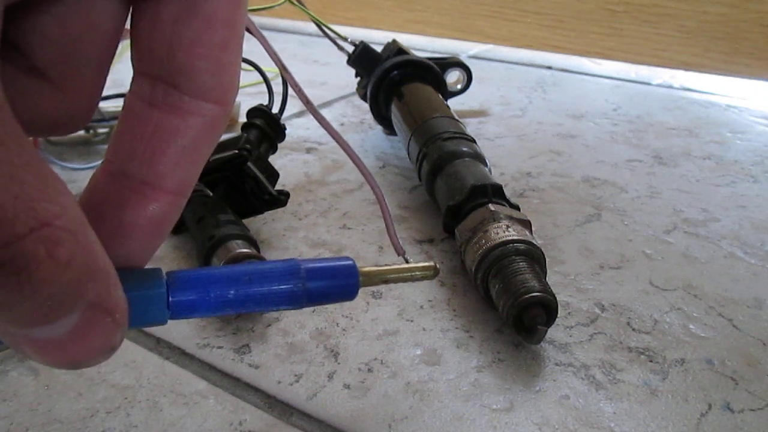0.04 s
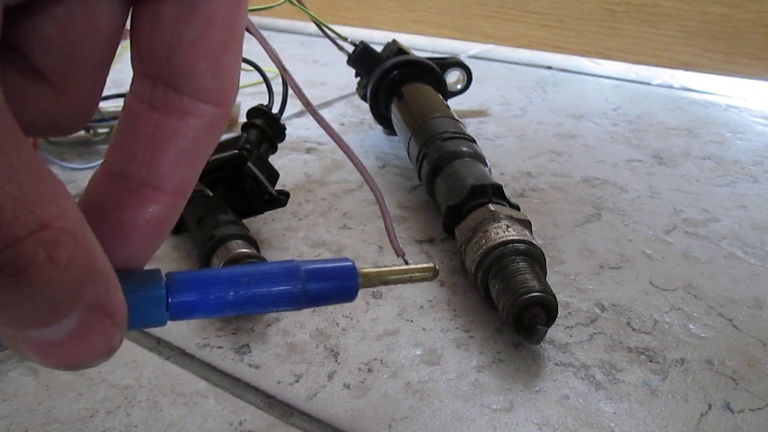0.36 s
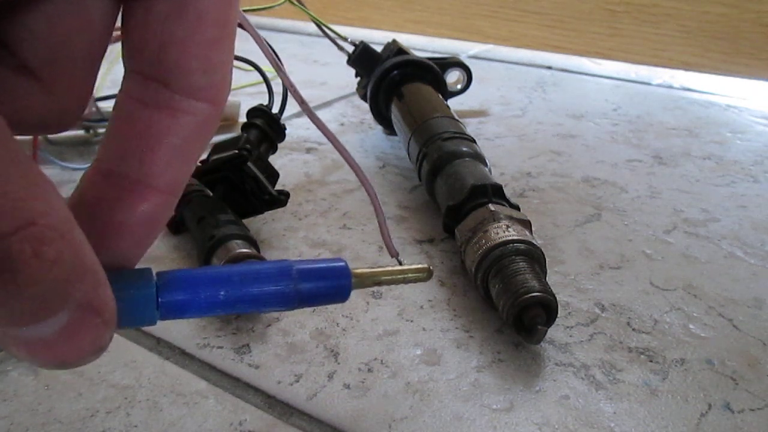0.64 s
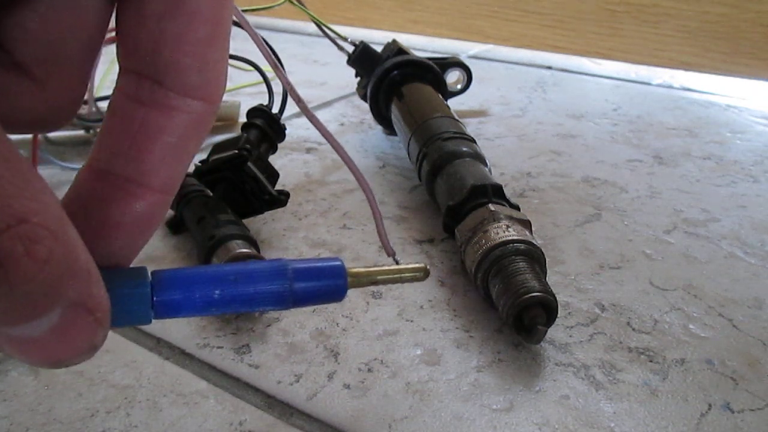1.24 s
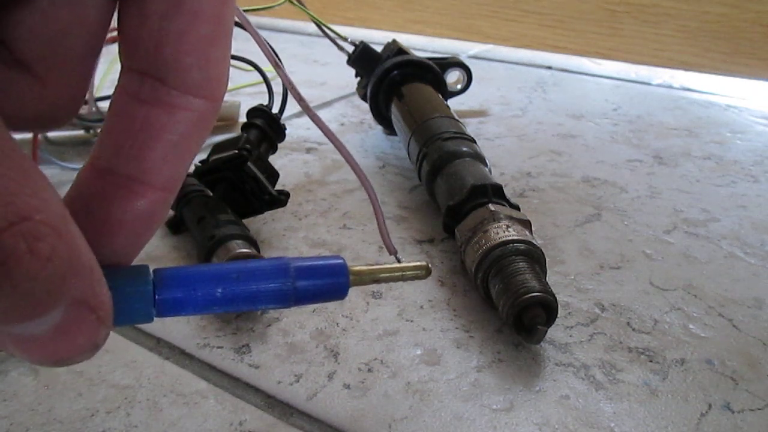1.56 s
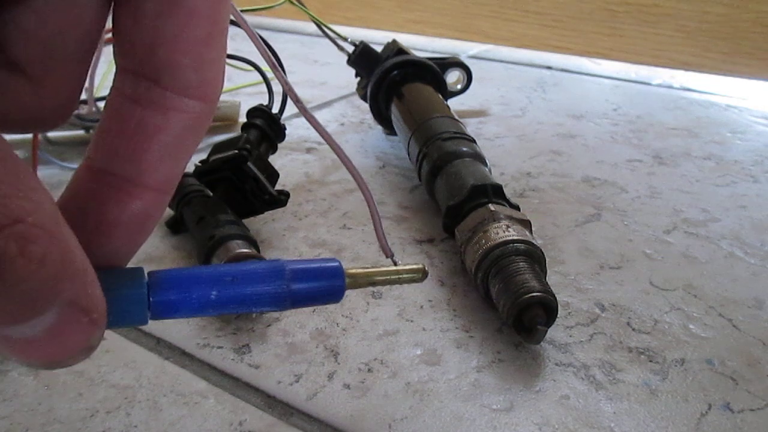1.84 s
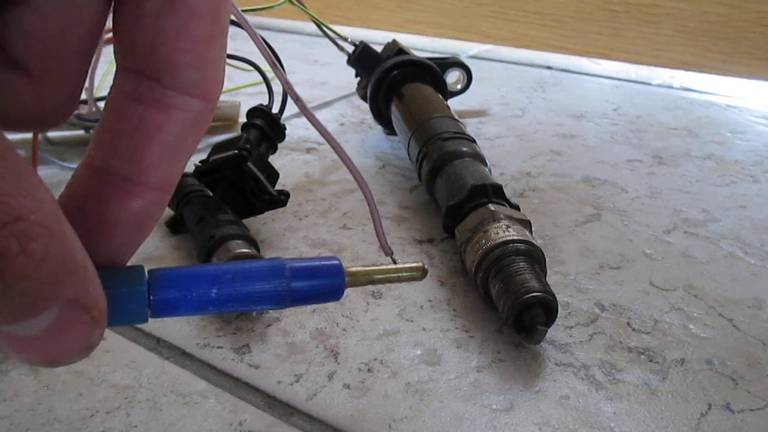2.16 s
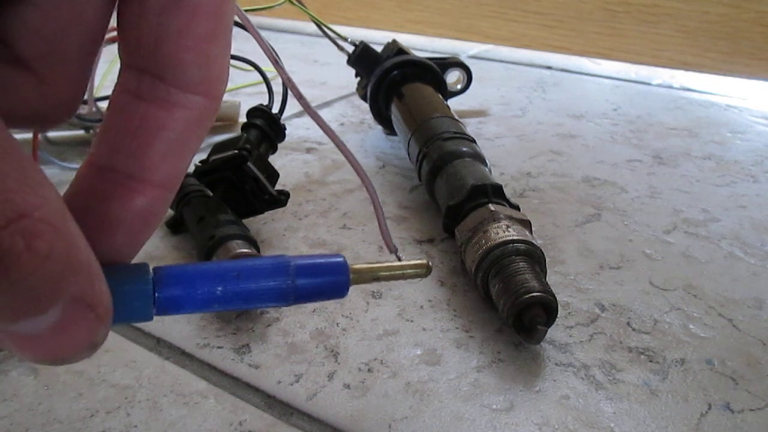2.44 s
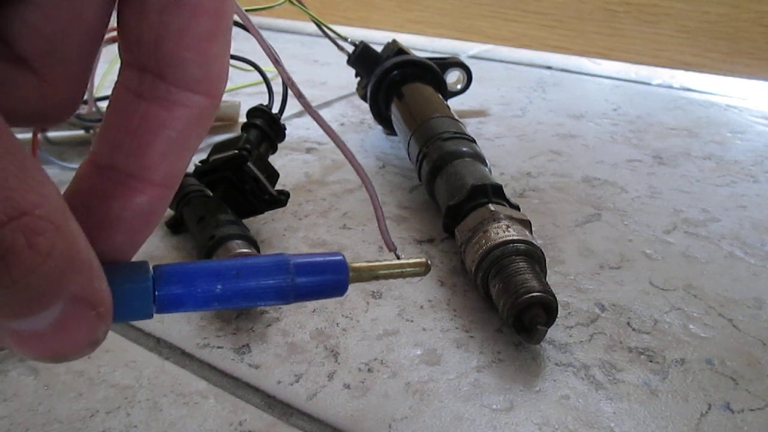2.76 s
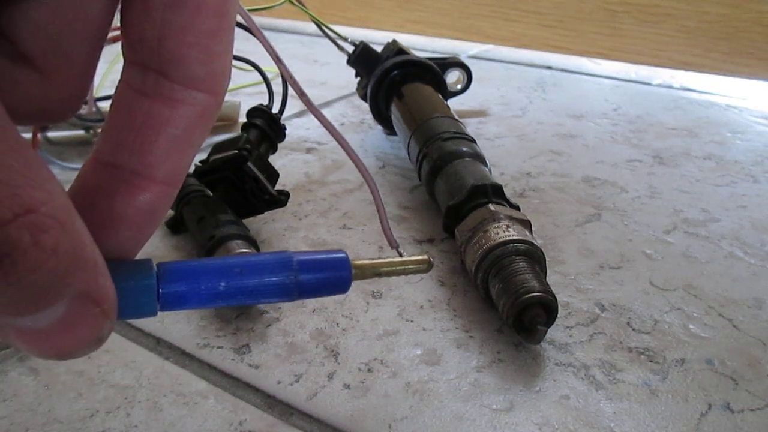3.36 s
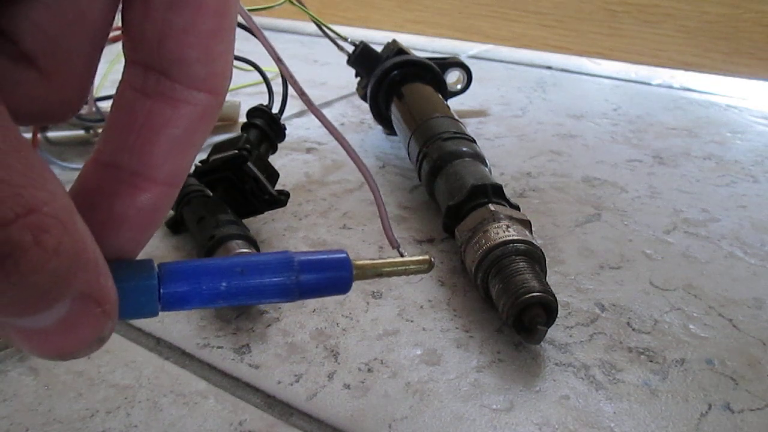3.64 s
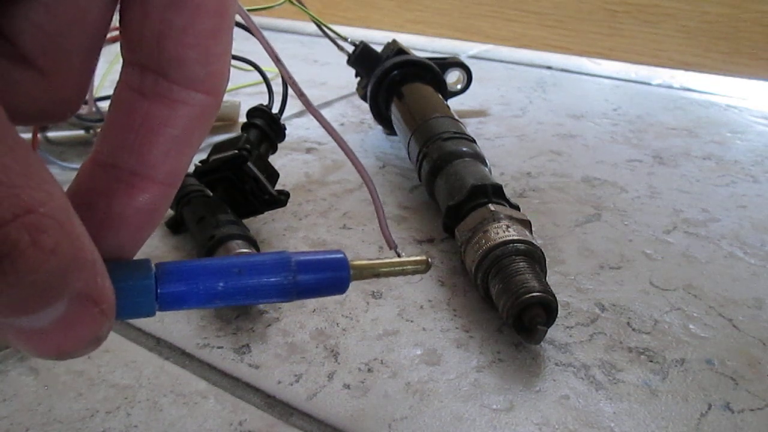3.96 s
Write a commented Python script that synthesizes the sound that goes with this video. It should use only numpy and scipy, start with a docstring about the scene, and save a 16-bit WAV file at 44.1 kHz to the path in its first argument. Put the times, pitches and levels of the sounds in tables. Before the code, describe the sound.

A spark plug snaps sharply, close up, about twice a second from 0.2 to 3.9 seconds. The snaps near 1.7 and 2.3 seconds are very quick crackling bursts. Midway between snaps, from 0.4 to 3.6 seconds, a fuel injector gives a weaker metallic click. Both have a short small-room echo. Faint hiss and hum dip after each spark and swell back.

```python
"""A stone workbench in a small room, with a stereo microphone close to a spark plug and a fuel injector.
They take turns, about twice a second each. A spark is a tiny shock wave that rings the parts around it;
some come in quick bursts, and the ignition coil knocks on the last. The injector clicks open and shut.
The room answers both. Automatic gain ducks after the sparks, and the faint hum and hiss swell back."""
import sys
import numpy as np
from scipy import signal
from scipy.fft import rfft, irfft
from scipy.io import wavfile
from scipy.ndimage import uniform_filter1d, minimum_filter1d

SR = 44100
rng = np.random.default_rng(int(sys.argv[2]) if len(sys.argv) > 2 else 0)


def dump_mix(stems):
    """Bounce the given channels to the path in sys.argv[1] as a 16-bit WAV at rate SR."""
    frames = np.atleast_2d(stems).T  # one column per channel
    limited = np.clip(frames, -1, 1)  # hard clip at full scale
    pcm = np.round(limited * 32767).astype(np.int16)
    wavfile.write(sys.argv[1], SR, pcm)


N = 176400  # 4 s


def amp(db):
    """Decibels to gain."""
    return 10 ** (np.asarray(db) / 20)


def curve(table, hz):
    """Read (frequency [Hz], value) points on a log-frequency axis."""
    freqs, values = np.array(table, float).T
    return np.interp(np.log(np.maximum(hz, 1)), np.log(freqs), values)


def colour(x, table):
    """Filter by (frequency [Hz], level [dB]) points."""
    hz = np.fft.rfftfreq(x.shape[-1], 1 / SR)
    return irfft(rfft(x) * amp(curve(table, hz)), x.shape[-1])


def add(out, start_s, x):
    """Mix a sound in at a time."""
    i = int(round(start_s * SR))
    out[i:i + len(x)] += x[:len(out) - i]


def room_tone():
    """Faint steady room noise, mains hum and a thin electronic whine."""
    # shape of the room noise (frequency [Hz], relative level [dB])
    floor = [(30, 4.5), (100, -3), (300, -2), (1000, -5.5), (2000, -8), (4000, -13.5), (8000, -17.5),
             (16000, -32)]
    # whine of the electronics (frequency [Hz], level [dB])
    whine = [(6857, -86), (13716, -84.5)]
    hum_hz, hum_db = 96.8, -79
    t = np.arange(N) / SR
    tones = sum(amp(db) * np.sqrt(2) * np.sin(2 * np.pi * hz * t) for hz, db in [(hum_hz, hum_db)] + whine)
    noise = colour(rng.standard_normal(N), floor)
    return amp(-69) * noise / noise.std() + tones


def pressure_swing(t, db, decay_s):
    """A dull swing of pressure, down and then up."""
    u = np.maximum(t, 0) / decay_s
    return amp(db) * (u - 1) * np.exp(-u) * (t >= 0)


def ring(t, hz, db, t60_s):
    """Damped modes, struck at t = 0, with unrelated phases."""
    phase = rng.uniform(0, 2 * np.pi, (len(hz), 1))
    fade = np.exp(-np.log(1000) * np.maximum(t, 0) / t60_s) * (t >= 0)
    return amp(db) @ np.sin(2 * np.pi * hz[:, None] * t + phase) * fade


def scatter(t, spectrum, decay_s):
    """A few milliseconds of dense, coloured scatter: a crack or a tick."""
    fade = np.exp(-np.maximum(t, 0) / decay_s) * (t >= 0)
    x = rng.standard_normal(len(t)) * fade
    for _ in range(3):  # even out the spectrum while keeping the sound short
        x = irfft(np.exp(1j * np.angle(rfft(x))), len(t)) * fade ** .5
    x = colour(x, spectrum) * (t >= 0) * np.linspace(1, 0, len(t))
    return x * np.linalg.norm(fade) / np.linalg.norm(x)


def sparks():
    """Each spark is a shock wave, a crack and a short ring; the coil knocks and thumps as a burst ends."""
    # bursts of sparks (time [s], sparks [count], level [dB])
    bursts = [(.1974, 1, -1), (.7089, 2, 0), (1.2283, 1, -0.5), (1.7401, 5, 0), (2.2850, 4, -0.5),
              (2.8213, 2, -0.5), (3.3413, 2, 0.5), (3.8612, 1, 1)]
    # modes of plug, coil and bench (frequency [Hz], level [dB])
    plug_modes = [(220, -13), (650, -7), (1250, -1), (1740, -3), (2210, -4), (2500, -5), (3355, 1),
                  (4050, 0), (4400, -4), (5420, -2), (6500, -8), (7550, -8), (8350, -8), (10000, -5)]
    # colour of the crack and the knock (frequency [Hz], relative level [dB])
    crack_colour = [(200, 14.5), (1000, -39), (3300, 4.5), (6000, -23), (10500, 13), (13000, 4.5),
                    (16000, -38)]
    shock_hz, lead_s, gap_s, knock_lag_s = 2890, .001, .0083, .0018
    fade_db_per_spark, last_accent_db = -2.5, 4.5
    t = np.arange(SR // 20) / SR - lead_s
    u = 2 * np.pi * shock_hz * t - 1
    shock = amp(-12) * u * np.exp((1 - u ** 2) / 2) + pressure_swing(t, db=-30.5, decay_s=.0006)
    after_shock = t - 1 / shock_hz
    hz, db = np.array(plug_modes, float).T
    ringing = amp(-31.5) * ring(after_shock, hz, db, t60_s=.017)
    crack = amp(-37.5) * scatter(after_shock, crack_colour, decay_s=.0025)
    knock = amp(-38.5) * scatter(t - knock_lag_s, crack_colour, decay_s=.0025)
    thump = pressure_swing(t, db=-24, decay_s=.0013)
    close, impulses = np.zeros(N), np.zeros(N)  # the bare impulses go out into the room
    for start, count, level in bursts:
        for k in range(count):
            last = k == count - 1
            when = start + k * gap_s
            gain = amp(level + (0 if last else k * fade_db_per_spark))
            accent = amp(last_accent_db * last)
            spark = shock + accent * (ringing + crack) + last * (knock + thump)
            add(close, when - lead_s, gain * spark)
            add(impulses, when, np.array([gain * accent]))
    return close, impulses


def room(impulses, strength):
    """Grainy reflections die away band by band; the two microphone ports differ mainly in the treble."""
    # reverberation of the small room (frequency [Hz], time to fall 60 dB [s])
    decay_times = [(150, 0.27), (1000, 0.29), (3000, 0.35), (7000, 0.31), (14000, 0.23)]
    build_s, blend_s, full_width_hz = .00083, .019, 20200
    t = np.arange(SR // 2) / SR
    hz = np.fft.rfftfreq(len(t), 1 / SR)
    grain = .6 * np.exp(-t / blend_s)  # single reflections stand out early, then blend
    echoes = rng.standard_normal((2, len(t))) * np.exp(grain * rng.standard_normal(len(t)))
    mid, side = rfft(echoes / echoes.std()) * amp(curve(strength, hz))
    stereo = mid + np.array([[1], [-1]]) * side * np.minimum(hz / full_width_hz, 1)
    tail = 0
    for centre_hz, t60 in decay_times:
        band = curve([(f, f == centre_hz) for f, _ in decay_times], hz)
        fade = np.exp(-np.log(1000) * t / t60) * (1 - np.exp(-t / build_s))
        tail = tail + irfft(stereo * band, len(t)) * fade / np.linalg.norm(fade)
    return signal.fftconvolve(impulses[None], tail, axes=1)[:, :N]


def injector():
    """The needle hits its stop, then its seat; each blow ticks and rings the housing."""
    # strokes of the needle (time [s], level [dB])
    strokes = [(0.449, -1), (.9690, -1), (1.4802, -1), (2.0252, -1), (2.5616, -1.5), (3.0815, -1),
               (3.6015, -0.5)]
    # modes of the housing (frequency [Hz], level on opening [dB], level on closing [dB])
    housing_modes = [(1320, -11, -13), (2260, -5, -3), (2850, -5, -10), (3240, -4, -8), (3900, -7, -11),
                     (4700, -11, -5), (5110, -12, -5), (5430, -1, -3), (5970, -6, -6), (7000, -2, -1),
                     (7700, -2, -4), (8180, -1, -5), (9850, -8, -2), (11400, -15, -9)]
    # colour of the needle's tick (frequency [Hz], relative level [dB])
    tick_colour = [(200, -11), (800, -16.5), (2200, -6), (3600, -5.5), (7000, -1), (10000, 1.5),
                   (13000, -20), (16000, -30)]
    open_s, rise_s = .0053, .00012
    t = np.arange(SR // 20) / SR
    hz, opening_db, closing_db = np.array(housing_modes, float).T
    close, impulses = np.zeros(N), np.zeros(N)  # the bare impulses go out into the room
    for lag, db in ((0, opening_db), (open_s, closing_db)):
        ringing = amp(-34) * ring(t, hz, db, t60_s=.012)
        tick = amp(-35) * scatter(t, tick_colour, decay_s=.0014)
        blow = (ringing + tick) * (1 - np.exp(-t / rise_s))
        for start, level in strokes:
            add(close, start + lag, amp(level) * blow)
            add(impulses, start + lag, amp([level]))
    return close, impulses


def scene():
    """Close up, both sources reach one microphone port a hair before the other; the room follows."""
    # the room's answer to a spark (frequency [Hz], level [dB])
    spark_room = [(80, -45), (250, -18.5), (600, -12), (1200, -6.5), (2000, -7), (3300, -8), (5000, -11),
                  (7000, -12.5), (10500, -14.5), (15000, -26.5)]
    # the room's answer to the injector (frequency [Hz], level [dB])
    injector_room = [(300, -73.5), (1300, -27.5), (1800, -31), (2250, -14.5), (3400, -22.5), (5300, -13),
                     (6200, -20), (7600, -11.5), (8800, -22.5), (11000, -20.5), (13500, -34.5)]
    port_lag_s = .000015
    snaps, shocks = sparks()
    clicks, blows = injector()
    port_phase = np.pi * np.fft.rfftfreq(N, 1 / SR) * port_lag_s * np.array([[-1], [1]])
    direct = irfft(rfft(snaps + clicks) * np.exp(1j * port_phase), N)
    return direct + room(shocks, spark_room) + room(blows, injector_room) + room_tone()


def record(dry):
    """The recorder's gain drops at loud peaks and creeps back; kinks near zero make quiet sound gritty."""
    reference_db, start_db, held_fall_db_per_s, squeeze = -16.5, -23.5, 34.5, .79
    fall_db = held_fall_db_per_s * np.arange(N) / SR
    peak_db = 20 * np.log10(np.abs(dry).max(axis=0) + 1e-9)
    held_db = np.maximum(np.maximum.accumulate(peak_db + fall_db), start_db) - fall_db
    gain_db = minimum_filter1d(squeeze * (reference_db - held_db), size=89)  # ducks 1 ms ahead
    x = dry * amp(uniform_filter1d(gain_db, size=45))
    mid = x.mean(axis=0)
    dead_zone, step_height, step_depth, step_width = amp(-61), amp(-60.5), amp(-62.5), amp(-107)
    x = x - .99 * dead_zone * np.tanh(mid / dead_zone)
    x = x + step_height / 2 * (np.tanh((mid + step_depth) / step_width) - 1)  # a step just below zero
    hiss = amp(-67) * rng.standard_normal(x.shape)
    low_pass = signal.ellip(8, .2, 70, 16000, fs=SR, output="sos")
    return signal.sosfilt(low_pass, x + hiss) + .0056  # DC offset


dry = scene()
out = record(dry)
dump_mix(out)
```